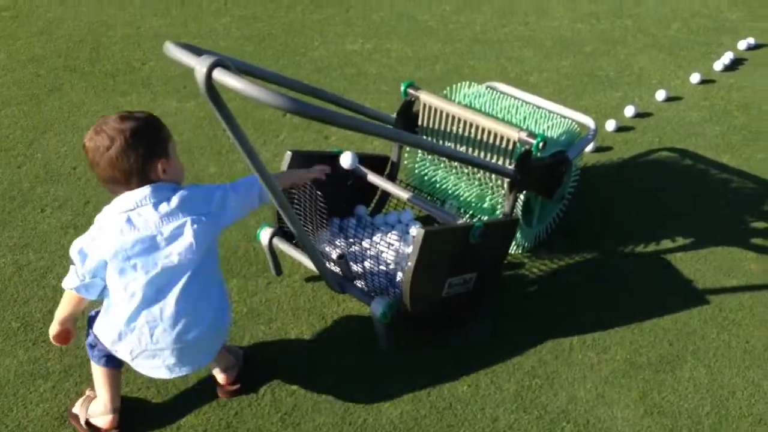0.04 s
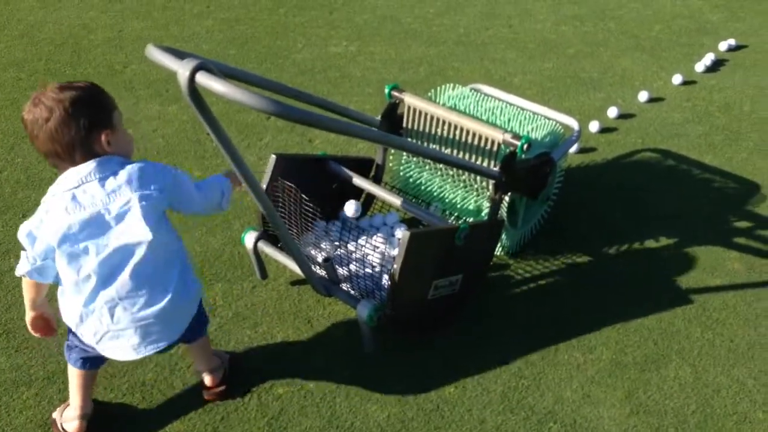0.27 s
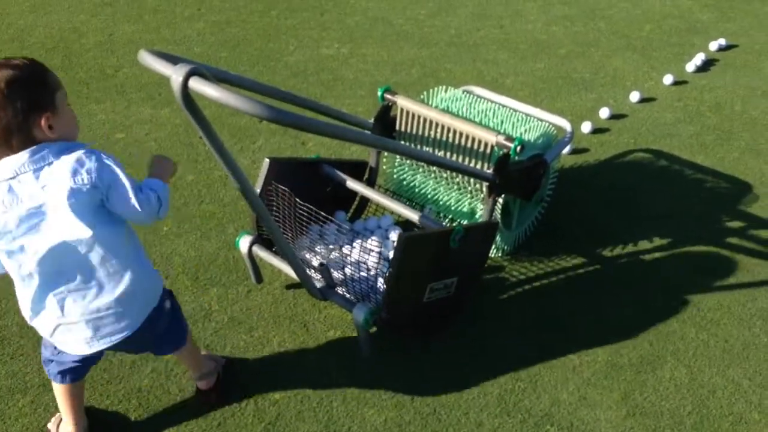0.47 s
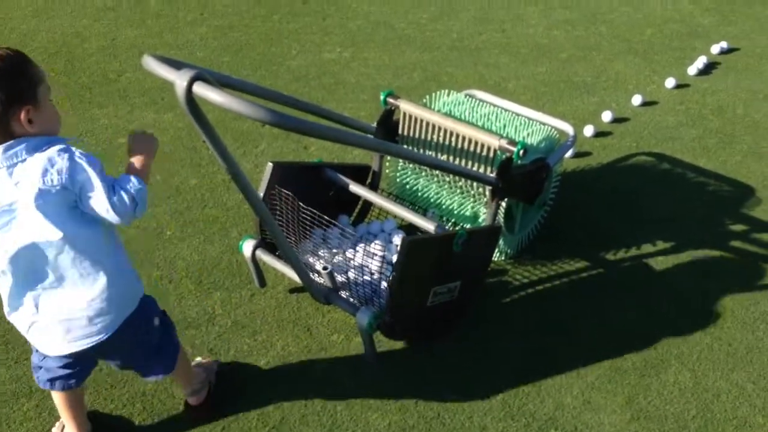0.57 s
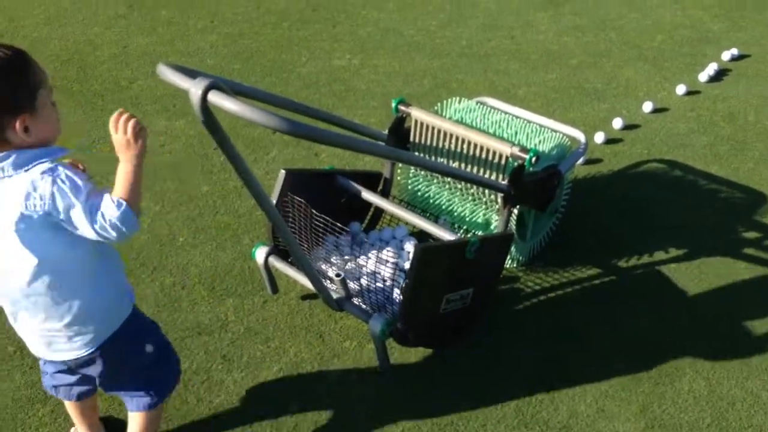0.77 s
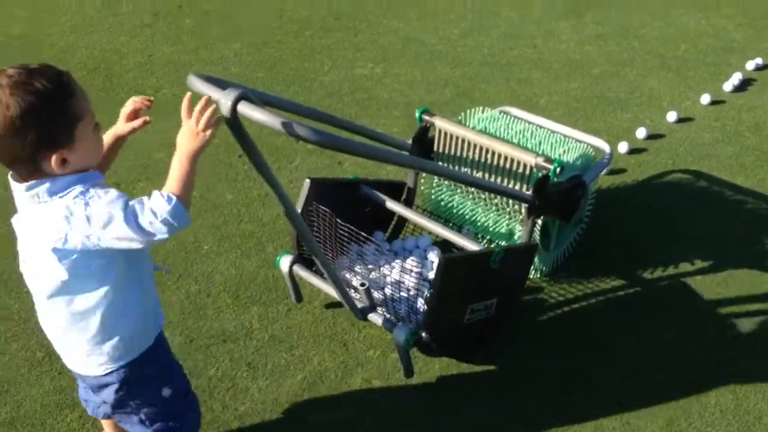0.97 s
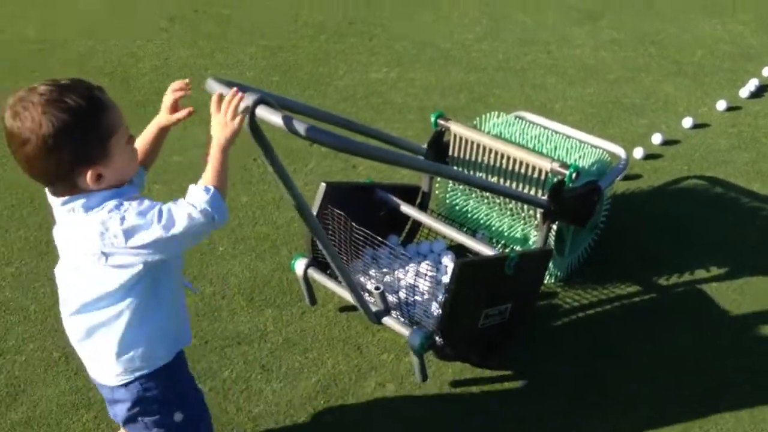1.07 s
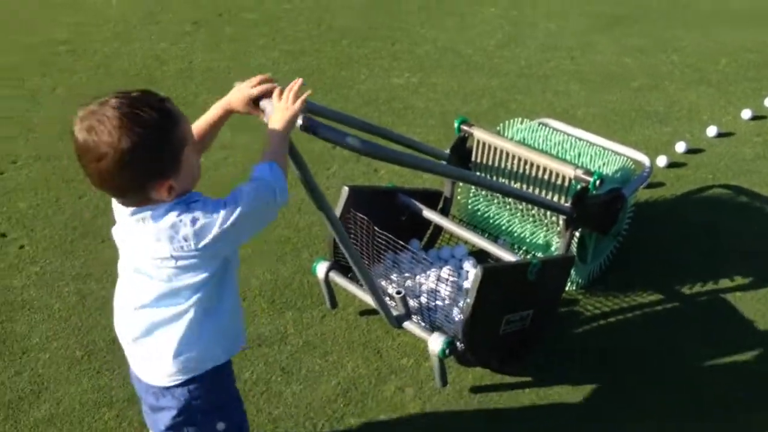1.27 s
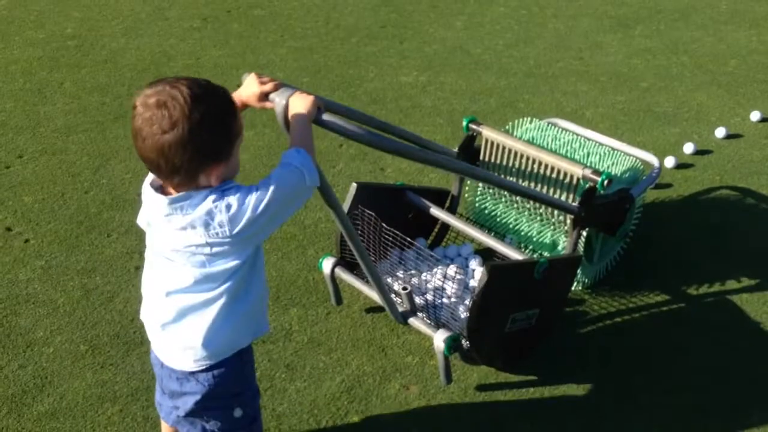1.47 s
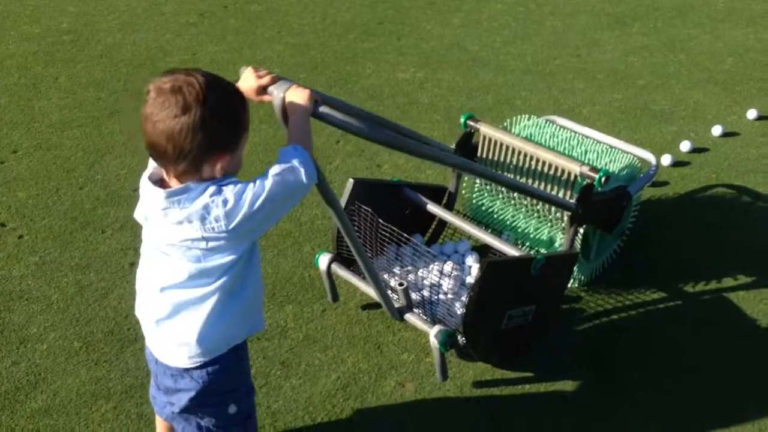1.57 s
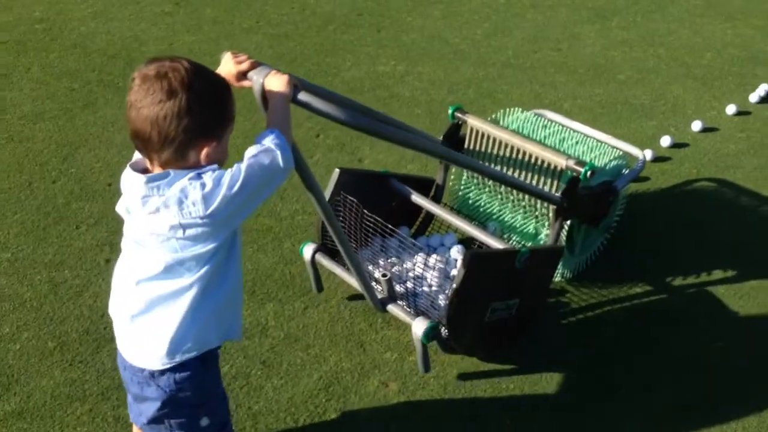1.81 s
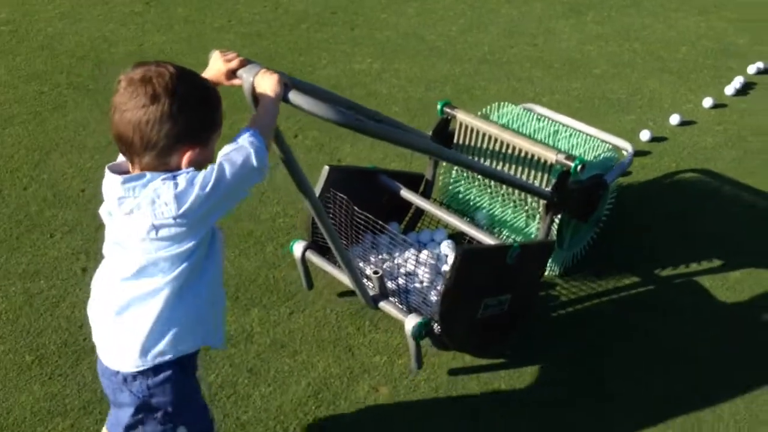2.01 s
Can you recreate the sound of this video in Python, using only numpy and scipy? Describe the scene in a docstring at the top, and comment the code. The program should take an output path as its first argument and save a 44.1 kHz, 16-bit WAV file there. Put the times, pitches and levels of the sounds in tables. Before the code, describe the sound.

A golf ball cracks into a metal basket and clacks down among other balls, outdoors.

```python
"""On a lawn, a low outdoor rumble, soft hiss and a faint far hum lie under everything.
A golf ball dropped into the basket of a ball collector cracks against the wall, pings and bounces.
It lands clacking among the other balls, the basket floor hums, and it rolls to rest with a few ticks.
Faint rustles follow close to the microphone, then one last tick."""
import sys
import numpy as np
from scipy import signal
from scipy.fft import rfft, irfft, next_fast_len
from scipy.io import wavfile
from scipy.ndimage import uniform_filter1d, map_coordinates

SR = 44100
rng = np.random.default_rng(int(sys.argv[2]) if len(sys.argv) > 2 else 0)


def master_out(mix):
    """Clip the mix to full scale and print it as 16-bit PCM to the path in sys.argv[1]."""
    frames = np.transpose(np.atleast_2d(mix))
    ceiling = np.clip(frames, -1, 1)
    pcm = np.round(ceiling * 32767).astype(np.int16)
    wavfile.write(sys.argv[1], SR, pcm)


N = 90404


def amp(db):
    return 10 ** (np.asarray(db) / 20)


def unit(x):
    return x / np.sqrt(np.mean(x ** 2) + 1e-20)


def along(points, hz):
    """Read a curve of (freq_hz, value) points on a log frequency axis."""
    freqs, values = np.transpose(points)
    return np.interp(np.log(hz + 1), np.log(freqs + 1), values)


def filtered(x, response):
    """Filter x by a gain that is a function of frequency."""
    n = x.shape[-1]
    padded = next_fast_len(n + 8192)
    return irfft(rfft(x, padded) * response(np.fft.rfftfreq(padded, 1 / SR)), padded)[..., :n]


def noise(colour, size):
    """Coloured noise of rms 1."""
    return unit(filtered(rng.standard_normal(size), lambda hz: amp(along(colour, hz))))


def wobble(rate):
    """A smooth random curve, rate knots a second."""
    knots = rng.standard_normal(int(N * rate / SR) + 4)
    return map_coordinates(knots, [np.arange(N) * rate / SR])


def add(track, start_s, sound):
    part = track[round(start_s * SR):][:len(sound)]
    part += sound[:len(part)]


def soften(x, cutoff_hz):
    """A softer contact loses its treble."""
    return signal.lfilter(*signal.butter(1, min(cutoff_hz, .45 * SR), fs=SR), x)


def burst(colour, t60_s, t):
    """A dying crack of noise, evened out so that no band of its colour is missing."""
    fade = amp(-60 * t / t60_s)
    spectrum = rfft(fade * rng.standard_normal(len(t)))
    hz = np.fft.rfftfreq(len(t), 1 / SR)
    power = uniform_filter1d(np.abs(spectrum) ** 2, size=int(500 / hz[1]))  # smoothed over 500 Hz
    flat = spectrum / np.sqrt(np.abs(power))
    crack = irfft(flat * amp(along(colour, hz)), len(t)) * (t < t[-1] / 2)
    return crack * np.linalg.norm(fade) / np.linalg.norm(crack)


def ring(modes, t, scatter_db):
    """Damped modes, each struck a little differently at every blow."""
    return sum(amp(db + scatter_db * rng.normal() - 60 * t / t60) * np.sin(2 * np.pi * hz * t)
               for hz, db, t60 in modes)


def clatter(colour, t60s, t):
    """Countless close modes: noise whose bands each die at their own speed."""
    centres = np.geomspace(100, 16000, 12)
    triangles = [list(zip(centres, row)) for row in np.eye(len(centres))]
    bands = filtered(noise(colour, len(t)), lambda hz: np.array([along(band, hz) for band in triangles]))
    return np.sum(bands * amp(-60 * t / along(t60s, centres)[:, None]), axis=0)


def strikes(hits, modes, colour, t60s, ring_db, clatter_db, crack_db, crack_t60_s, attack_s):
    """Every contact gives a short crack, ringing modes and a dense clatter, with little deep bass."""
    out, t = np.zeros(N), np.arange(SR // 3) / SR
    attack = 1 - np.exp(-t / attack_s)
    for start_s, db, cutoff_hz in hits:
        crack = amp(crack_db) * burst(colour, crack_t60_s, t)
        body = amp(ring_db) * ring(modes, t, scatter_db=3.5)
        body += amp(clatter_db) * clatter(colour, t60s, t)
        add(out, start_s, amp(db) * soften((crack + body) * attack, cutoff_hz))
    return signal.sosfilt(signal.butter(3, 151, "highpass", fs=SR, output="sos"), out)


def outdoors():
    """Around the lawn: a swelling low rumble, soft hiss and a faint far hum."""
    # swells of the rumble: time_s, level_db
    swells = [(0, -58), (.06, -56), (.11, -57.5), (.35, -61.5), (.72, -62), (.85, -57), (.93, -61.5),
              (1.19, -57), (1.36, -59), (1.47, -59), (1.53, -61.5), (1.6, -57), (1.76, -59.5), (2.04, -58)]
    # spectra of the rumble and the hiss: freq_hz, density_db
    rumble_colour = [(20, -18), (50, -2.5), (100, -2), (170, 0), (230, -4.5), (300, -14), (500, -28),
                     (1500, -48.5)]
    hiss_colour = [(100, -4.5), (400, -2), (800, 0.5), (1800, -2.5), (2700, -5.5), (4000, -4.5),
                   (6500, -8.5), (10000, -9), (15000, -13)]
    t = np.arange(N) / SR
    rumble_db = np.interp(t, *np.transpose(swells)) + 1.5 * wobble(12.1)
    rumble = amp(rumble_db) * noise(rumble_colour, N)
    hiss = amp(-64 + .31 * wobble(6.9)) * noise(hiss_colour, N)
    hum_hz, hum_db = 384, -77
    hum = amp(hum_db) * np.sqrt(2) * np.sin(2 * np.pi * hum_hz * t + .5 * wobble(3))
    return rumble + hiss + hum


def basket_wall():
    """The ball cracks against the basket wall and bounces; wall and mesh ring and clatter."""
    # ball on the wall: start_s, level_db, cutoff_hz
    hits = [(.2037, -25, 15900), (.2052, -9.5, 9500), (.2745, -58, 600), (.2846, -26, 770),
            (.2897, -38.5, 2460), (.3018, -41.5, 1500)]
    # ringing of the wall: pitch_hz, level_db, t60_s
    modes = [(225, -20, .08), (308, -17, .24), (450, -14, .06), (548, -17, .1), (620, -28, .24),
             (1017, -22, .16), (1326, -12, .09), (1568, -10, .075), (1726, -16, .1), (1920, -18, .11),
             (2430, -10, .035), (2528, -4, .05), (2720, -10, .04), (6352, -5, .055)]
    # spectrum of crack and clatter: freq_hz, density_db
    colour = [(60, -24), (150, -4), (430, -1), (650, -5), (1000, -5.5), (1400, 1), (2100, -1), (2700, 1.5),
              (3600, -5), (6500, -1), (9500, -9), (11800, -16), (15000, -16)]
    # decay of the clatter: freq_hz, t60_s
    t60s = [(150, .16), (400, .17), (1500, 0.15), (3000, .125), (7000, 0.095), (14000, 0.1)]
    return strikes(hits, modes, colour, t60s,
                   ring_db=-5.5, clatter_db=-10.5, crack_db=.5, crack_t60_s=.04, attack_s=.0005)


def ball_pings():
    """Hard contacts with the wall make the ball itself ping briefly."""
    # contacts that ring the ball: start_s, level_db
    hits = [(0.208, -24.5), (0.2884, -56.5), (0.301, -68)]
    # high ringing of the ball: pitch_hz, level_db, t60_s
    modes = [(8320, -2, .06), (9720, -4, .055), (10020, -1, .06), (12520, -7, .04), (12630, -5, .04),
             (15050, -13, .04)]
    out, t = np.zeros(N), np.arange(SR // 5) / SR
    attack = 1 - np.exp(-t / .0006)
    for start_s, db in hits:
        add(out, start_s, amp(db) * ring(modes, t, scatter_db=1) * attack)
    return out


def ball_clacks():
    """Balls knock together with short, bright clacks."""
    # ball against ball: start_s, level_db, cutoff_hz
    hits = [(.4595, -42, 7000), (.4665, -42.5, 6000), (.4730, -46, 4970), (.529, -65, 6000)]
    # ringing of a clack: pitch_hz, level_db, t60_s
    modes = [(3160, 3.5, 0.047), (4360, -1, 0.033), (4800, 1, 0.028), (5160, -6.5, 0.048),
             (5460, -7, 0.025)]
    # spectrum of crack and clatter: freq_hz, density_db
    colour = [(100, 5), (800, 4), (1500, 2.5), (3000, 0), (5000, -0.5), (6500, -6), (15000, -12.5)]
    # decay of the clatter: freq_hz, t60_s
    t60s = [(500, 0.076), (10000, 0.037)]
    return strikes(hits, modes, colour, t60s,
                   ring_db=1.5, clatter_db=3, crack_db=5, crack_t60_s=.016, attack_s=.00032)


def ball_heap():
    """The landing ball shakes the heap of balls and the mesh under it."""
    # ball on the heap: start_s, level_db, cutoff_hz
    hits = [(.4672, -30.5, 3000), (.4748, -37.5, 1790), (.4792, -35.5, 1000)]
    # ringing of heap and mesh: pitch_hz, level_db, t60_s
    modes = [(582, -20, 0.099), (756, -13, 0.1), (1009, -21, 0.14), (1366, -16, 0.14), (1724, -16.5, 0.15),
             (1838, -5, 0.057), (2250, -3.5, 0.033), (2630, -10, 0.05)]
    # spectrum of crack and clatter: freq_hz, density_db
    colour = [(60, 3), (150, 5.5), (330, 2), (450, -13), (800, 1), (2000, 3), (3500, -9), (5000, -9),
              (6500, -25), (15000, -25)]
    # decay of the clatter: freq_hz, t60_s
    t60s = [(150, 0.4), (1000, 0.099), (3000, 0.12), (10000, 0.041)]
    return strikes(hits, modes, colour, t60s,
                   ring_db=-3, clatter_db=-5, crack_db=.5, crack_t60_s=.033, attack_s=.0004)


def basket_floor():
    """The loaded floor hums under the ball's weight."""
    # thumps on the floor: start_s, level_db
    thumps = [(.467, -49), (.5042, -46.5)]
    # low ringing of the floor: pitch_hz, level_db, t60_s
    modes = [(153, -15, .15), (215, 0, .32), (285, -13, .2)]
    out, t = np.zeros(N), np.arange(SR // 2) / SR
    attack = 1 - np.exp(-t / .002)
    for start_s, db in thumps:
        add(out, start_s, amp(db) * ring(modes, t, scatter_db=1) * attack)
    return out


def rolling():
    """The ball grates softly over its neighbours until it rests in a gap."""
    # rise and fall of the roll: time_s, level_db
    levels = [(.49, -83), (.51, -73), (.555, -62), (.6, -82), (.68, -92)]
    # spectrum of the grating: freq_hz, density_db
    colour = [(100, -4.5), (350, 2), (1000, -3.5), (2500, -2.5), (5000, -10), (12000, -21.5)]
    level_db = np.interp(np.arange(N) / SR, *np.transpose(levels), left=-120, right=-120)
    grain = amp(3 * wobble(220))
    return amp(level_db) * unit(grain * noise(colour, N))


def ticks():
    """Settling balls and the frame make light contacts with no ring."""
    # light contacts: start_s, level_db, cutoff_hz
    hits = [(.506, -51, 1200), (.5663, -41, 7000), (.6605, -41.5, 3000), (.6630, -52, 2500),
            (1.9475, -42, 2500)]
    # spectrum of a tick: freq_hz, density_db
    colour = [(150, 5), (450, 11), (1000, -12), (2700, 2.5), (5000, -2.5), (14000, -25)]
    out, t = np.zeros(N), np.arange(SR // 10) / SR
    for start_s, db, cutoff_hz in hits:
        add(out, start_s, soften(amp(db) * burst(colour, t60_s=.01, t=t), cutoff_hz))
    return out


def rustles():
    """Close to the microphone, brief grainy scuffs start and stop sharply among small snaps."""
    # scuffs: start_s, length_s, level_db
    scuffs = [(1.4878, .012, -53.5), (1.5, .022, -55), (1.541, .021, -63.5), (1.7245, .005, -52.5)]
    # sharp snaps: start_s, level_db
    snaps = [(1.4874, -58), (1.6975, -54), (1.7234, -41), (1.727, -53)]
    # spectrum of both: freq_hz, density_db
    colour = [(300, -12), (1500, -7.5), (2400, -1), (5200, 0), (9500, -3), (12000, -8), (15000, -9)]
    out, t = np.zeros(N), np.arange(SR // 10) / SR
    for start_s, length_s, db in scuffs:
        grain = amp(-1.5 * wobble(900)[:len(t)])
        release = np.exp(-np.maximum(t - length_s, 0) / .002)
        add(out, start_s, amp(db) * release * unit(grain * noise(colour, len(t))))
    for start_s, db in snaps:
        add(out, start_s, amp(db) * burst(colour, t60_s=.0062, t=t))
    return out


def scene():
    """Basket, rustles and open air meet at one microphone."""
    bounce = basket_wall() + ball_pings()
    landing = ball_heap() + ball_clacks() + basket_floor()
    settling = rolling() + ticks()
    return (bounce + landing + settling + rustles() + outdoors())[None]


def record(dry):
    """The camera's microphone channel keeps nothing above its band limit."""
    top_hz = 15400
    return filtered(dry, lambda hz: 1 / np.sqrt(1 + (hz / top_hz) ** 160))


dry = scene()
out = record(dry)
master_out(out)
```